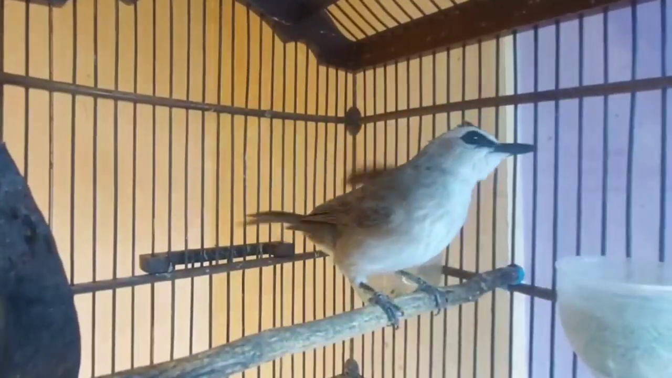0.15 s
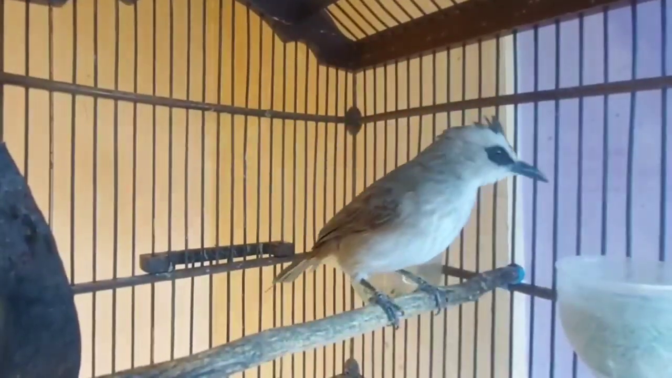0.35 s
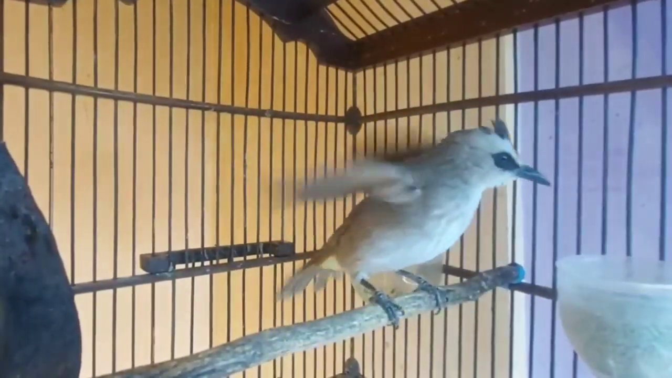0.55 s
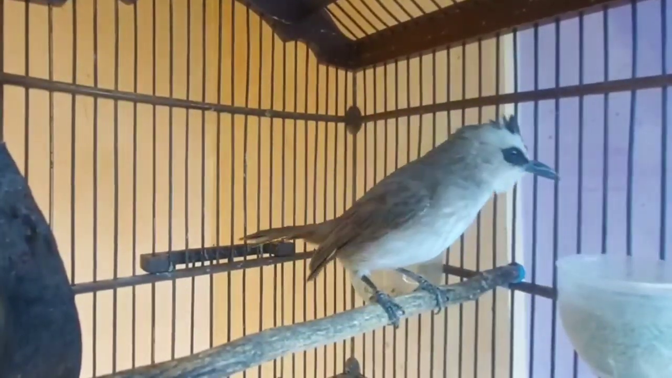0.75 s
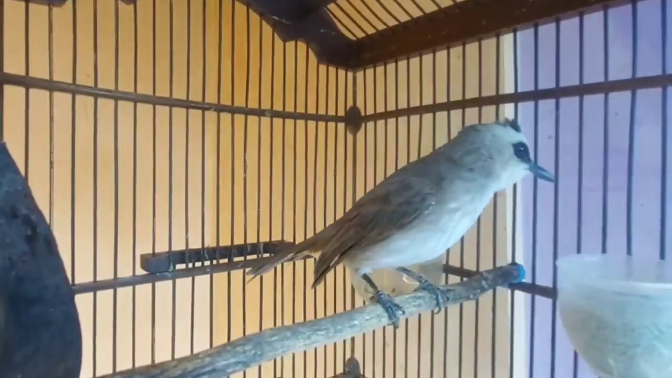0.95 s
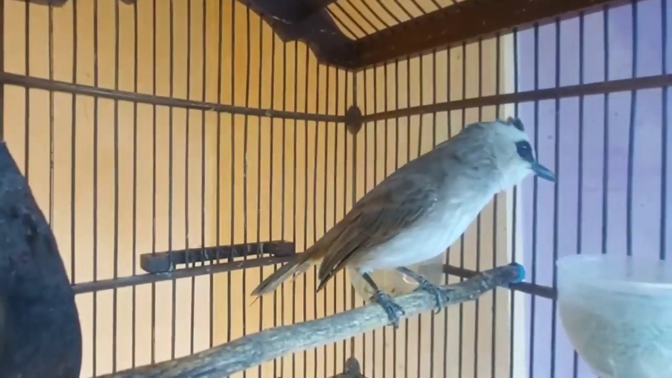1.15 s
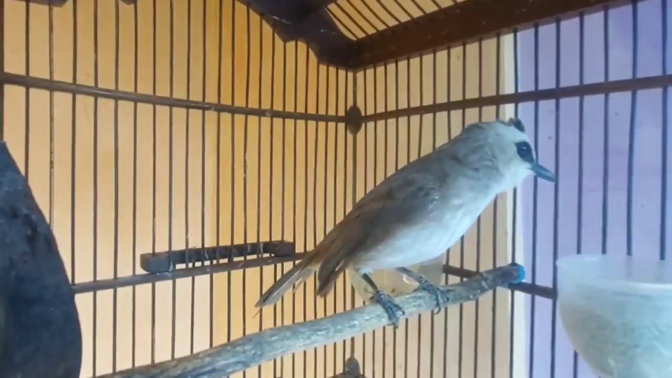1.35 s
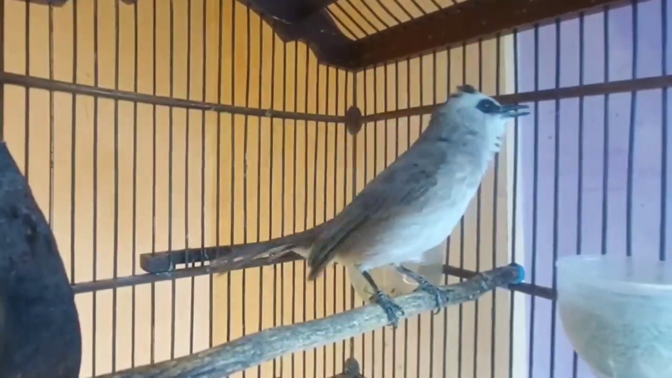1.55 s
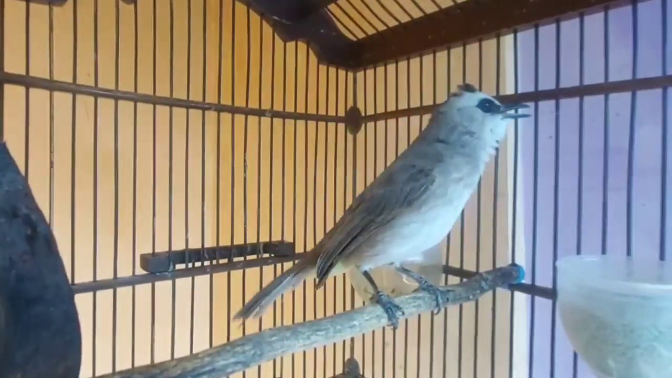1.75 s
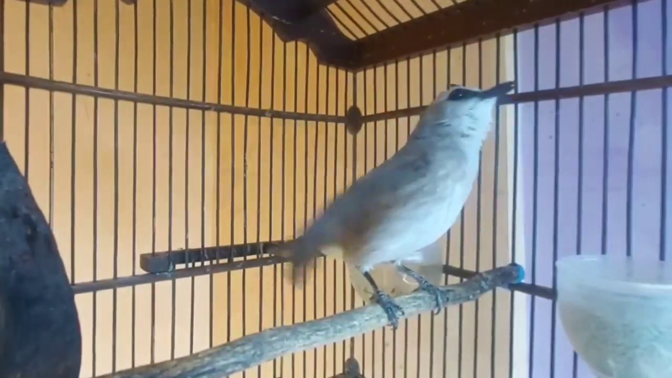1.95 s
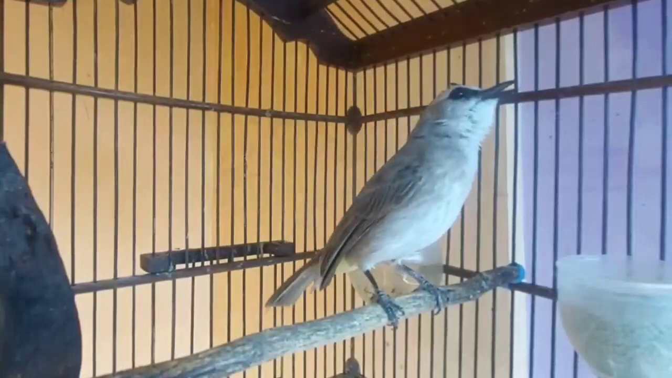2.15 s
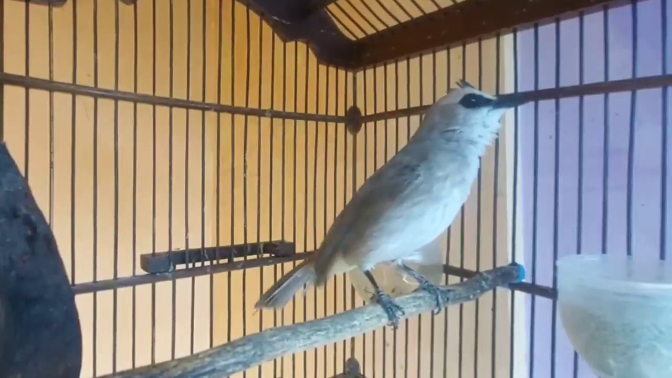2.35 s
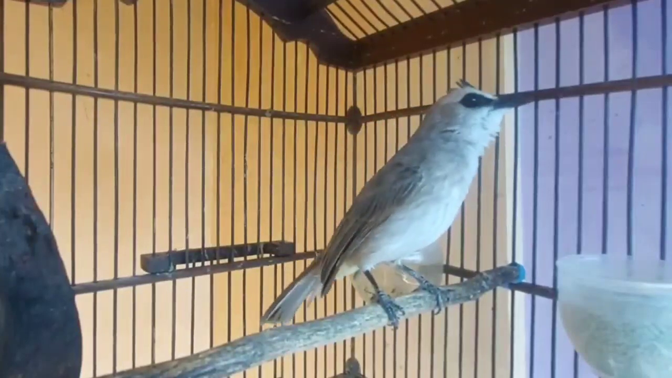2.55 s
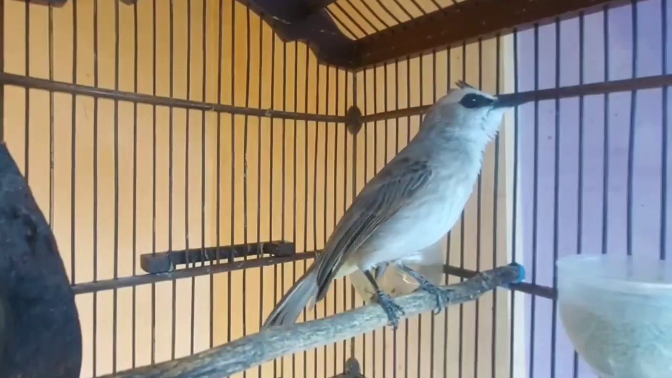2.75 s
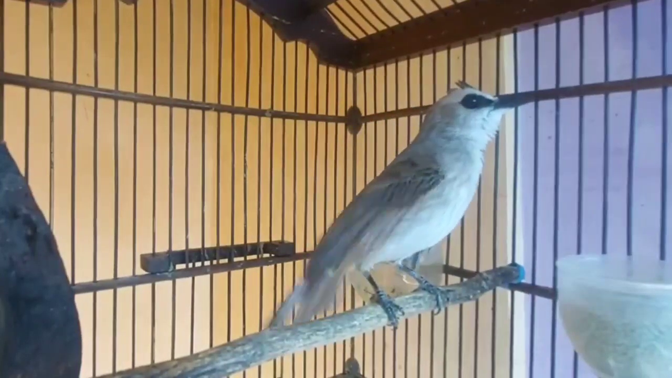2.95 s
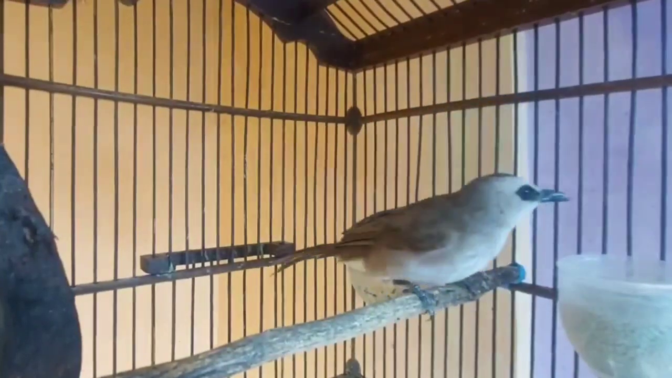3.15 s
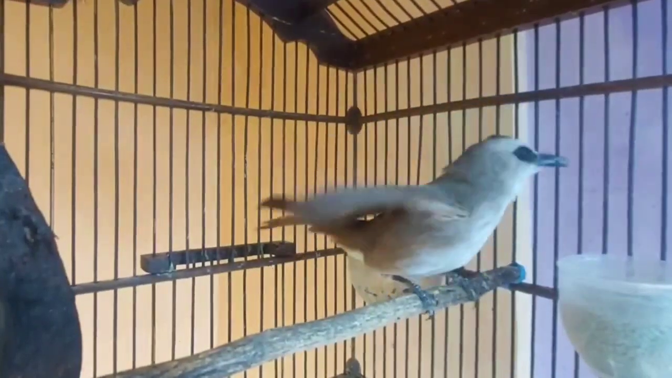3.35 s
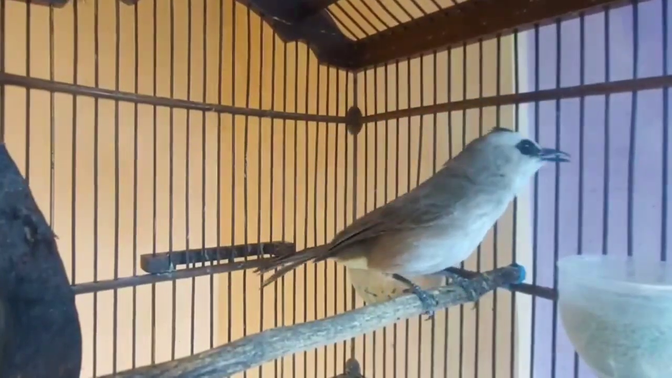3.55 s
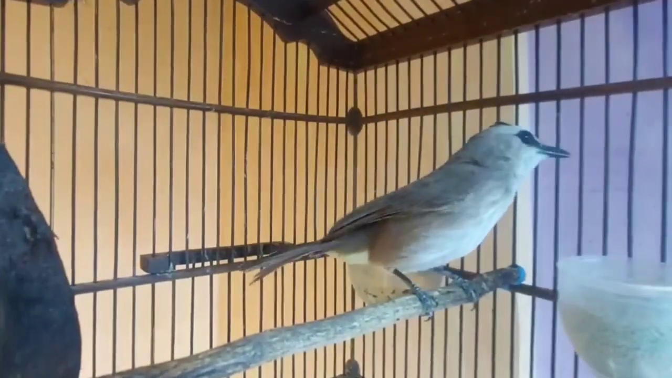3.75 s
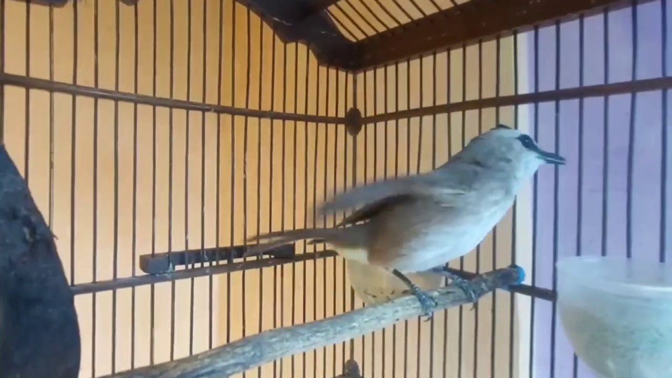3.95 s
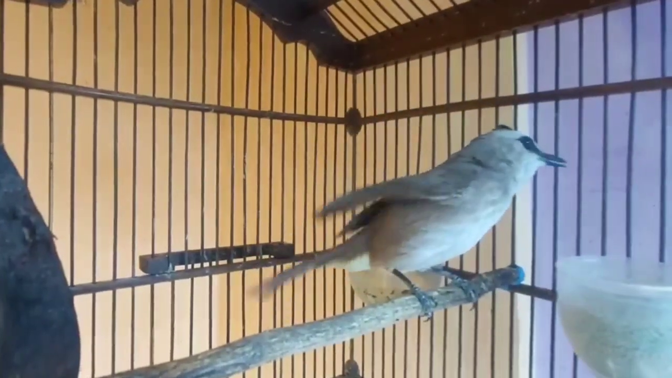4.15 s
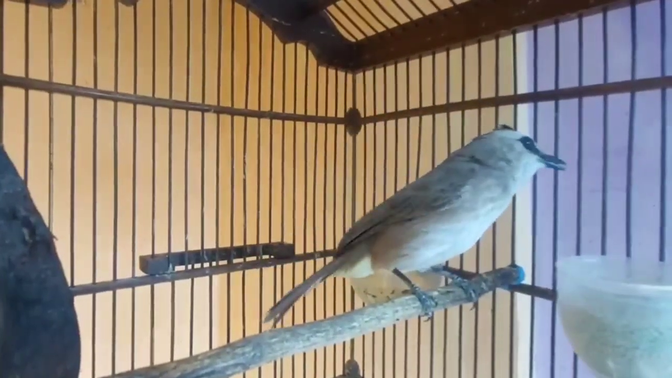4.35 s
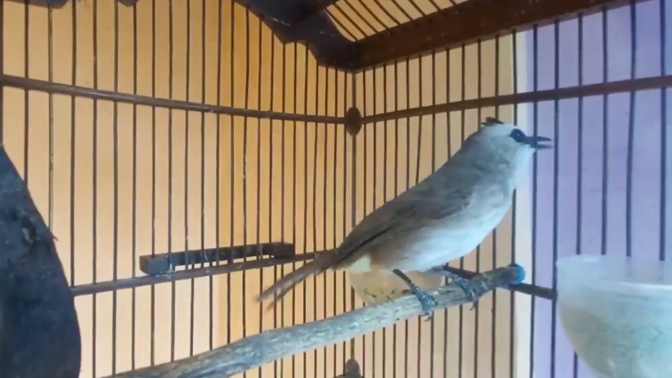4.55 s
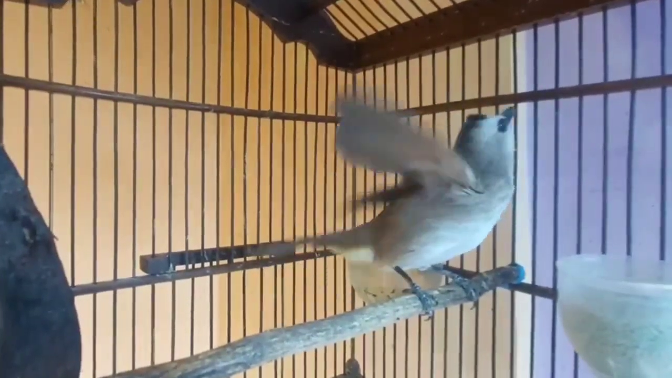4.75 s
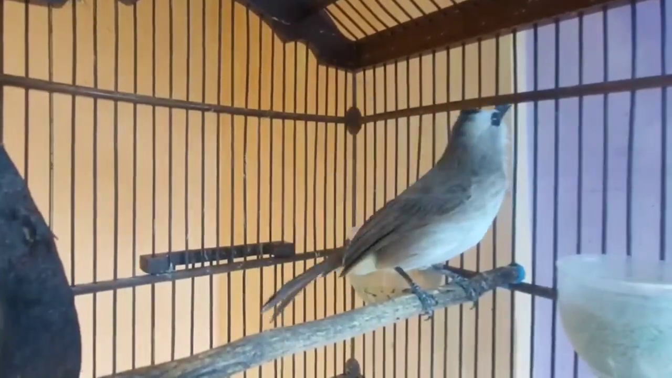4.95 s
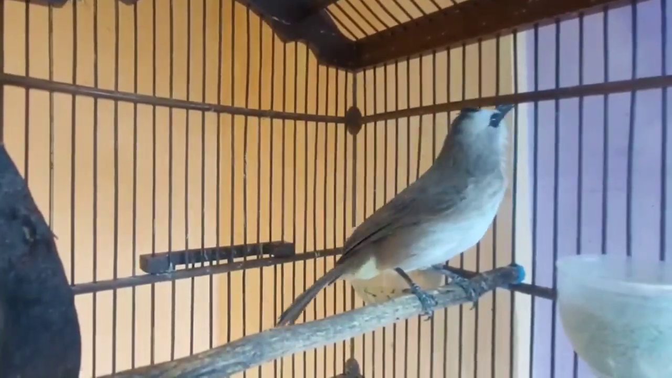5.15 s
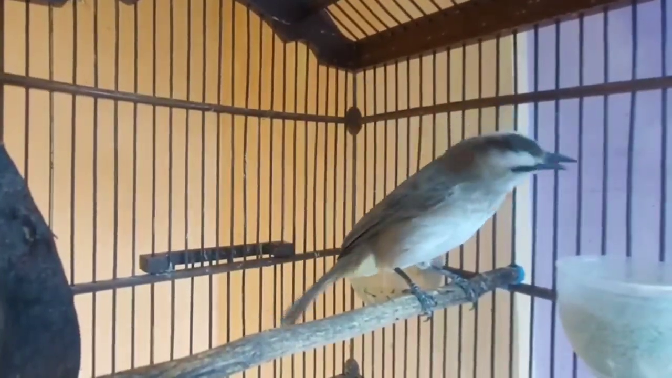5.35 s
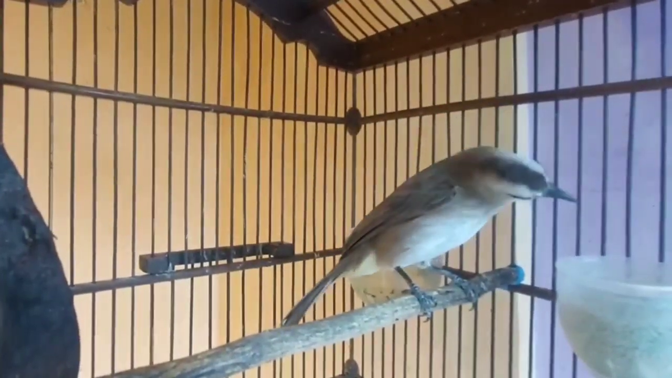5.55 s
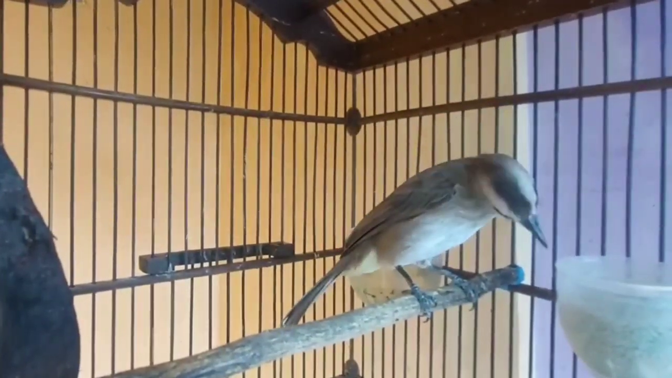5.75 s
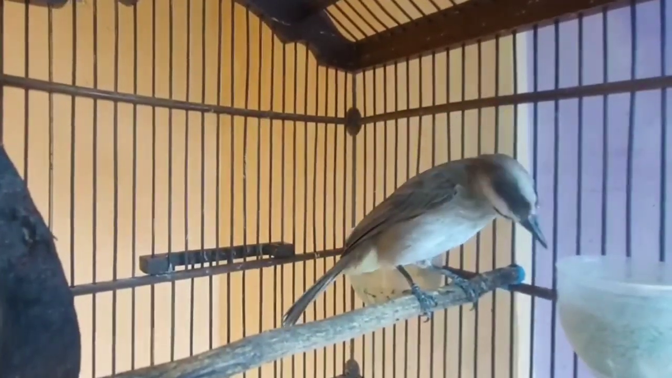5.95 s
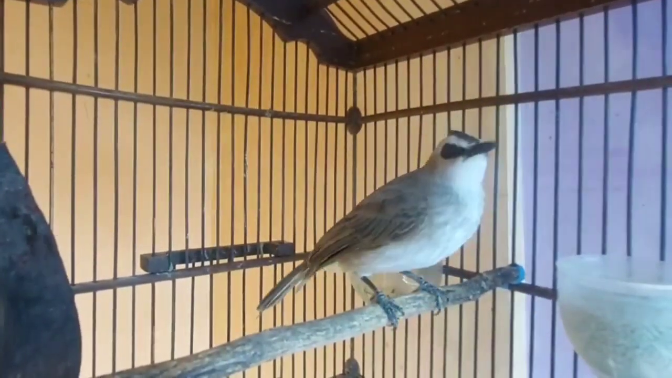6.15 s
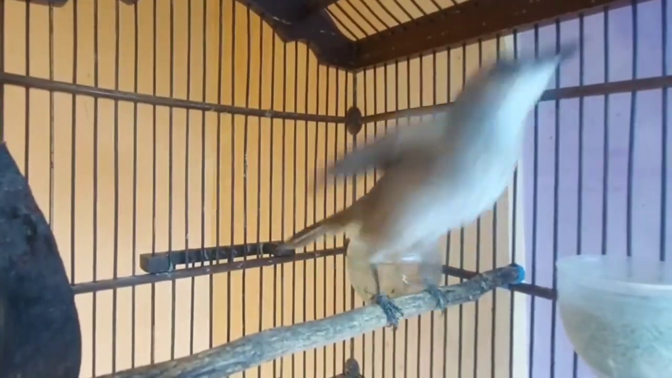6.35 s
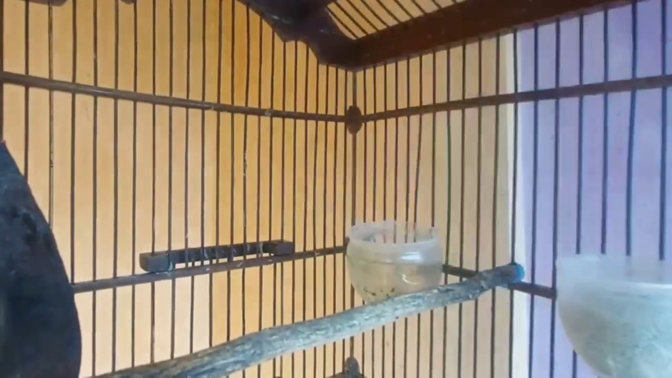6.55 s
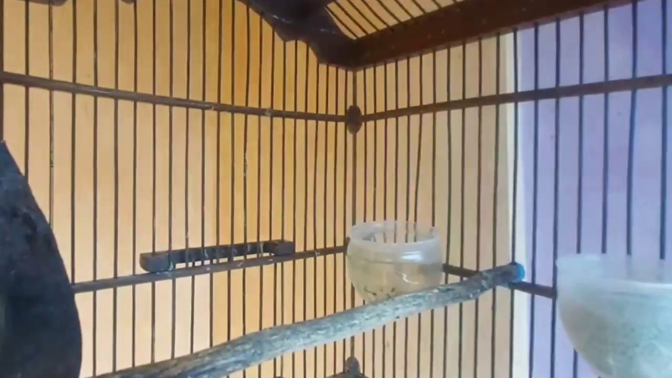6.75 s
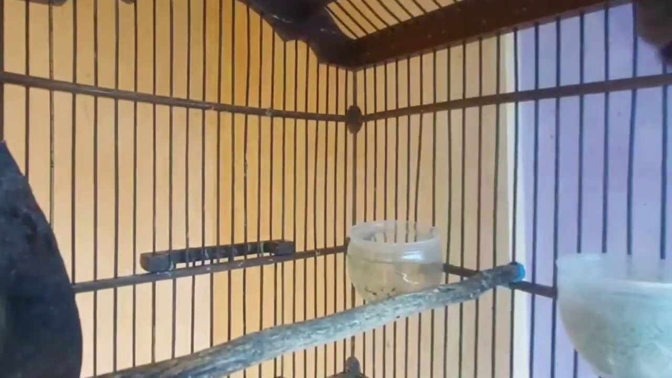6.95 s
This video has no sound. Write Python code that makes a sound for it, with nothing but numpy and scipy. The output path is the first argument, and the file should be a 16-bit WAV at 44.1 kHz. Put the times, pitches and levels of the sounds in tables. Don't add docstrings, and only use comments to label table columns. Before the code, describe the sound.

A caged songbird close by gives two chups, a fast tumbling phrase and a run of sharp chips, then rattles and flutters off over low hum.

```python
import sys
import numpy as np
from scipy import signal
from scipy.fft import rfft, irfft, next_fast_len
from scipy.io import wavfile
from scipy.ndimage import uniform_filter1d

SR = 44100
rng = np.random.default_rng(int(sys.argv[2]) if len(sys.argv) > 2 else 0)


def gain_from_decibels(decibels):
    exponent = np.asarray(decibels, float) / 20
    return 10 ** exponent


def wrap_up_sound(samples):
    columns = np.atleast_2d(samples).T
    tamed = np.clip(columns, -1, 1)
    steps = np.round(tamed * 32767).astype(np.int16)
    wavfile.write(sys.argv[1], SR, steps)


N = 312669

# time_s, pitch_hz, effort_db
CHUP = [(0, 2600, -26), (.004, 2500, -19), (.006, 1950, -6), (.013, 2050, -5), (.02, 1900, 0),
        (.026, 1600, -4), (.032, 1460, -2), (.039, 1350, -20)]
SLIDE = [(0, 3837, -28), (.004, 3688, -1), (.008, 2918, 1.5), (.022, 2352, -4), (.045, 2100, -4),
         (.07, 1922, -5), (.078, 1810, -19.5)]
ARCH = [(0, 798, -14), (.015, 1444, 1), (.03, 2219, 2), (.042, 2865, -2), (.048, 2837, -8),
        (.051, 2500, 5.5), (.056, 1510, -0.5), (.063, 835, -12.5)]
PLUNGE = [(0, 2990, -16.5), (.004, 2701, 4.5), (.011, 1932, 3), (.021, 1300, -7), (.034, 850, -6.5)]
DIP = [(0, 2995, -6.5), (.005, 2735, 6), (.018, 2550, 1), (.025, 2370, -21)]
LIFT = [(0, 1338, -6), (.008, 3106, -2), (.024, 2787, 2.5), (.046, 3095, 7.5), (.058, 3593, -3),
        (.063, 3714, -28.5)]
HOP = [(0, 1915, -11), (.003, 1845, 3), (.009, 2050, 0.5), (.013, 2742, 7), (.017, 2524, 2),
       (.025, 2400, -3.5), (.035, 1872, 0.5), (.044, 1764, -22)]
CHIP = [(0, 2641, -13.5), (.004, 2420, -7.5), (.009, 2085, -2.5), (.011, 2970, 7), (.017, 2940, 4.5),
        (.024, 2541, 0.5), (.029, 2330, 0.5), (.048, 2133, 1), (.054, 2220, -29)]
PEEP = [(0, 3255, -15), (.008, 2714, 14.5), (.022, 2425, 7.5), (.038, 2100, 7.5), (.044, 2160, -33.5)]
HOOK = [(0, 3636, -21), (.005, 2990, 5.5), (.01, 2202, -2.5), (.018, 2442, 1), (.032, 2300, -5),
        (.04, 2360, -27)]
RATTLE = [(0, 2936, -6), (.004, 2725, 3), (.011, 1659, -1), (.017, 2334, -0.5), (.034, 2228, -4.5),
          (.039, 2140, -30)]

# start_s, level_db, pitch_factor, length_factor
CHUPS = [(.809, 4.5, 0.98, 0.97), (1.123, 4, 0.98, .91)]
SLIDES = [(1.51, -5.5, 0.94, 0.99), (1.886, -4, 0.95, 1.06), (2.301, -3, 1, .81)]
ARCHES = [(1.635, -9, 1.03, 0.98), (2.028, -10, .99, 1.05), (2.522, -9.5, .97, .99)]
PLUNGES = [(2.369, -9, 1.01, 1.01)]
DIPS = [(1.703, -6, 0.99, 0.95), (2.101, -5.5, 0.98, 0.87), (2.419, -15, .72, 0.95),
        (2.596, -8, 0.89, 0.85)]
LIFTS = [(1.762, -10, 1.037, 1.01), (2.161, -8, 1.007, 1.163), (2.656, -8, .99, 1.01)]
HOPS = [(3.475, -7, 1.01, 1.01)]
CHIPS = [(3.725, -6.5, .96, .98), (3.961, -7.5, .91, 1.01), (4.175, -6, 1, .95), (4.301, -6, .98, .9),
         (4.462, -5, 1.02, .9), (4.589, -5, 1, .88), (4.759, -6, 1.013, .93), (4.906, -7, 1.01, .88),
         (5.087, -7.5, 0.99, .96), (5.434, -7, 1.001, .9)]
PEEPS = [(6.56, -19.5, 0.97, 1.09)]
HOOKS = [(6.65, -4.5, .97, .85)]
RATTLES = [(6.735, -4.5, 1.03, 0.9), (6.815, -5, 0.97, .9), (6.902, -8.5, .99, 0.87)]

# shape, times_sung, undertone_db, octave_db, air_db, buzz_depth (0-1), brightness_db
VOICES = [(CHUP, CHUPS, -25.5, -39.5, -12.5, 0.05, -1.7), (SLIDE, SLIDES, -30.5, -36.5, 4.6, 0.88, -1.8),
          (ARCH, ARCHES, -35.5, -25, 8.7, 0.16, -8), (PLUNGE, PLUNGES, -30.5, -24.5, -1, 0.1, -1),
          (DIP, DIPS, -43, -32.5, 3.5, 0.067, -5.5), (LIFT, LIFTS, -40, -22.5, -9, 0.04, 3),
          (HOP, HOPS, -23, -34, 4.7, .6, 5), (CHIP, CHIPS, -33.5, -32.5, -0.63, 0.18, 5.97),
          (PEEP, PEEPS, -18, -10.5, 3, 0.069, -1), (HOOK, HOOKS, -26, -14, -6.5, 0.071, -2.5),
          (RATTLE, RATTLES, -27, -14, -25, 0.29, 2.2)]
OVERTONES_DB = [-29.5, -26, -30, -31.5, -34.5, -32, -33.5]
# freq_hz, gain_db
THROAT = [(700, -17), (1500, -8), (2300, 3.5), (3200, -7), (4500, -3.5), (7000, -17.5), (9600, -11.5),
          (12000, -2), (15500, -5.5)]
# freq_hz, density_db_per_hz
AIR = [(2500, -22), (3600, -4), (4400, -10.5), (5800, -11.5), (7500, -39.5), (9300, -1), (11600, -2.5),
       (13500, -21.5), (16000, -26.5)]
AIR_DB = -26
BUZZ_HZ, LEAD_S, LEAD_DB_PER_S = 461.6, .004, 9000
RASP, WHIM = .035, .014
ONSET_OCTAVE_DB = 12.5

# start_s, peak_db, decay_s
TICKS = [(0.909, -35.5, .002), (3.047, -57.5, .02), (3.201, -50, 0.0013), (6.465, -36, 0.00252),
         (6.572, -28, 0.011), (6.619, -23.5, 0.0089)]
# start_s, length_s, start_hz, end_hz, level_db
FAR = [(0, 0.015, 2620, 2630, -37), (.038, 0.024, 3080, 3020, -43.5), (.195, 0.038, 2550, 2515, -32.5),
       (.407, 0.025, 2050, 3120, -38.5), (.485, 0.047, 3120, 2980, -40), (.609, 0.015, 2600, 2570, -41.5),
       (.679, 0.042, 2607, 2328, -31.5), (.895, 0.076, 3480, 3550, -42), (1.073, 0.038, 2133, 2142, -32.5),
       (1.09, 0.012, 2600, 2750, -37), (1.237, 0.08, 3750, 3780, -47), (1.398, 0.22, 2270, 2400, -42.5),
       (1.413, 0.028, 2570, 2740, -40.5), (2.975, 0.041, 2840, 3130, -60), (3.06, 0.15, 2030, 1950, -65),
       (5.813, 0.044, 4480, 4510, -64), (5.95, 0.0467, 3760, 3166, -56), (6.116, 0.025, 3740, 2430, -49.5),
       (6.152, 0.024, 3750, 3790, -48), (6.255, 0.022, 3120, 2313, -46.5), (6.282, 0.051, 2437, 2910, -50),
       (6.35, 0.05, 3830, 3220, -56), (6.339, 0.22, 2180, 2204, -39.5)]
# start_s, length_s, start_hz, end_hz, level_db
SHRILL = [(5.766, 0.059, 4055, 3950, -57), (5.84, 0.051, 3890, 3460, -55.5)]
SHRILL_OVERTONE_DB = -15.5
# delay_s, level_db
ECHOES = [(.0013, -26.5), (.0031, -16), (.0057, -12), (.0092, -11), (.0135, -17.5), (.019, -30),
          (.026, -20.5)]
# freq_hz, t60_s
ROOM = [(1000, 0.21), (2500, 0.27), (5000, 0.13), (11000, 0.18)]
ROOM_DB = -13.5

# cut_s, held_rumble_db, release_s, back_s, back_rumble_db
DUCKS = [
    (1.512, -42.5, 3.2, 3.47, -26),
    (3.469, -41.5, 5.07, 6.35, -36.5),
    (6.68, -35, 7.0, 7.09, -38.5),
]
OPEN_DB, CUT_S, SAG_DB = -31.5, 0.044, -2
TAKE_OFF = (6.6, -28)
# freq_hz, density_db_per_hz
RUMBLE = [(20, -31), (42, -1), (85, 1), (130, -8), (200, -10), (350, -17), (550, -23), (1600, -44.5),
          (3000, -85)]
# freq_hz, level_db (re rumble)
HUM = [(100, 0), (300, -10), (183, -18), (505, -23)]
# freq_hz, density_db_per_hz
HISS = [(500, 4), (1200, 5.5), (2500, 9), (5000, -4), (8000, -7.5), (11000, -5.5), (14500, -7),
        (16300, -18.5)]
HISS_DB, HISS_SHARE = -54, 1.3
CRICKET_HZ, CRICKET_DB = 5800, -17.5
WASH_DB, WASH_S = -64, 0.091
# start_s, length_s, level_db, centre_hz, width_octaves
RUSTLES = [(0.196, 0.14, -57.5, 9000, 0.97), (0.624, 0.2, -54.5, 7960, 1.8), (1.31, 0.11, -52, 1080, 0.36),
           (2.701, 0.27, -59, 1300, .5), (3.209, 0.22, -49, 2780, 0.64), (3.353, 0.091, -50, 4400, 0.28),
           (3.394, 0.08, -55, 10900, 0.49), (6.414, 0.33, -53, 2908, 1.6), (6.47, 0.053, -48, 10120, 0.6),
           (6.55, 0.11, -44.5, 9000, 2.1), (6.964, 0.039, -58.5, 10200, 0.84)]


def evened(x):
    return x / np.sqrt(np.mean(x ** 2) + 1e-20)


def read(points, hz):
    f, value = np.transpose(points)
    return np.interp(np.log(hz + 1), np.log(f + 1), value)


def add(mix, start_s, sound):
    part = mix[round(start_s * SR):][:len(sound)]
    part += sound[:len(part)]


def coloured(x, points):
    size = next_fast_len(len(x))
    gain = gain_from_decibels(read(points, np.fft.rfftfreq(size, 1 / SR)))
    return irfft(rfft(x, size) * gain, size)[:len(x)]


def drift(seconds):
    size = max(round(seconds * SR), 1)
    once = uniform_filter1d(rng.standard_normal(N), size)
    return evened(uniform_filter1d(once, size))


def streaky(patchy_db):
    z = signal.stft(rng.standard_normal(N), nperseg=256)[2]
    patches = uniform_filter1d(rng.standard_normal(z.shape), size=2, axis=0)
    patches = uniform_filter1d(patches, size=9, axis=1)
    return evened(signal.istft(z * gain_from_decibels(patchy_db * evened(patches)), nperseg=256)[1][:N])


def bird():
    voice, breath = np.zeros(N), np.zeros(N)
    wobble, whim = drift(0.0016), drift(.012)
    falter = 1.5 * np.tanh(drift(.0025) / 1.3)
    beat = np.sin(2 * np.pi * np.cumsum(BUZZ_HZ * (1 + 0.35 * drift(0.0033))) / SR)
    for shape, rows, under_db, octave_db, air_db, buzz, bright_db in VOICES:
        at_s, pitch_hz, effort_db = np.transpose(shape)
        for start_s, db, pitch, length in rows:
            t = np.arange(-LEAD_S, at_s[-1] * length, 1 / SR)
            now = slice(round(start_s * SR), round(start_s * SR) + len(t))
            settled = 1 - np.exp(-(np.maximum(t, 0) / 0.01) ** 2)

            scatter = 0.011 + RASP * buzz ** 2 * settled
            hz = pitch * np.interp(t, at_s * length, pitch_hz)
            hz = hz * (1 + scatter * wobble[now] + WHIM * whim[now])
            turn = 2 * np.pi * np.cumsum(hz) / SR

            slack_db = 24 * np.clip(2.1 - hz / 1050, -.6, 1)
            upper = gain_from_decibels(octave_db + slack_db + 4.1 * wobble[now]) * np.sin(2 * turn)
            pure_start = (hz > 2500) | (abs(np.gradient(hz)) > 2.4)
            onset = np.where(pure_start, settled, gain_from_decibels(ONSET_OCTAVE_DB * (1 - settled)))
            upper *= uniform_filter1d(onset, size=80)
            for multiple, over_db in enumerate(OVERTONES_DB, 3):
                gain = settled * gain_from_decibels(over_db + 0.09 * slack_db + wobble[now][::-1])
                upper += gain * np.sin(multiple * turn) * (multiple * hz < 15500)
            under = gain_from_decibels(under_db) * (np.sin(turn / 2) + .5 * np.sin(3 * turn / 2))

            level = gain_from_decibels(db + np.interp(t, at_s * length, effort_db) + LEAD_DB_PER_S * np.minimum(t, 0))
            level *= signal.windows.tukey(len(t), .08) * (1 + buzz * settled * beat[now])
            level *= gain_from_decibels(2.5 * falter[now])
            add(voice, start_s - LEAD_S, level * (np.sin(turn) + under + gain_from_decibels(bright_db) * upper))
            add(breath, start_s - LEAD_S, level * gain_from_decibels(air_db + bright_db - 99 * t))
    rush = evened(coloured(streaky(patchy_db=5.5), AIR))
    return coloured(voice, THROAT) + gain_from_decibels(AIR_DB) * breath * rush


def ticks():
    out, grit = np.zeros(N), evened(coloured(rng.standard_normal(N), HISS))
    for start_s, db, decay_s in TICKS:
        add(out, start_s, gain_from_decibels(db) * np.exp(-np.arange(0, 6 * decay_s, 1 / SR) / decay_s))
    return out * grit


def far_birds():
    out, wobble = np.zeros(N), drift(0.0013)
    for rows, over in ((FAR, 0), (SHRILL, gain_from_decibels(SHRILL_OVERTONE_DB))):
        for start_s, length_s, from_hz, to_hz, db in rows:
            hz = np.linspace(from_hz, to_hz, round(length_s * SR))
            waver = wobble[round(start_s * SR):][:len(hz)]
            turn = 2 * np.pi * np.cumsum(hz * (1 + .024 * waver)) / SR
            tone = np.sin(turn) + over * (np.sin(2 * turn) + np.sin(3 * turn))
            tone *= gain_from_decibels(3 * waver[::-1])
            add(out, start_s, gain_from_decibels(db) * tone * signal.windows.tukey(len(hz), .4))
    return out


def cage(x):
    out = x.copy()
    for k, (delay_s, db) in enumerate(ECHOES):
        add(out, delay_s, (-1) ** k * gain_from_decibels(db) * x)
    return out


def room(x):
    taps = np.zeros(SR)
    at = np.arange(300, SR - 20, 20) + rng.integers(0, 20, (SR - 301) // 20)
    taps[at] = rng.choice([-1., 1.], len(at))
    hz, t, z = signal.stft(taps, SR, nperseg=256)
    decay = gain_from_decibels(-60 * t / read(ROOM, hz)[:, None])
    tail = signal.istft(z * decay, SR, nperseg=256)[1]
    return signal.fftconvolve(x, tail / np.linalg.norm(tail))[:N]


def rustles():
    out, flutter = np.zeros(N), gain_from_decibels(1.9 * drift(0.026))
    for start_s, length_s, db, hz, octaves in RUSTLES:
        hump = [(hz * 2 ** (k * octaves), -6. * k * k) for k in range(-4, 5)]
        puff = evened(coloured(rng.standard_normal(SR // 2), hump))[:round(length_s * SR)]
        add(out, start_s, gain_from_decibels(db) * puff * signal.windows.tukey(len(puff), .5))
    return out * flutter


def gain_control():
    points = [(0, OPEN_DB), (DUCKS[0][0], OPEN_DB), TAKE_OFF]
    for cut_s, held_db, release_s, back_s, back_db in DUCKS:
        points += [(cut_s + CUT_S, held_db), (release_s, held_db + SAG_DB), (back_s, back_db)]
    return np.interp(np.arange(N) / SR, *np.transpose(sorted(points)))


def background(song):
    t = np.arange(N) / SR
    rumble = evened(coloured(rng.standard_normal(N), RUMBLE)) * gain_from_decibels(1.1 * drift(0.03))
    hum = sum(gain_from_decibels(db + 1.5 * drift(.05)) * np.sin(2 * np.pi * hz * t) for hz, db in HUM)
    hiss = evened(coloured(rng.standard_normal(N), HISS)) * gain_from_decibels(0.77 * drift(0.017))
    cricket = gain_from_decibels(CRICKET_DB + 4 * drift(.15)) * drift(0.0041) * np.sin(2 * np.pi * CRICKET_HZ * t)

    keep = np.exp(-1 / (WASH_S * SR))
    wash = gain_from_decibels(WASH_DB) * np.sqrt(signal.lfilter([1 - keep], [1, -keep], evened(song) ** 2))
    level_db = gain_control()
    hiss_level = gain_from_decibels(HISS_DB + HISS_SHARE * (level_db - OPEN_DB))
    low = gain_from_decibels(level_db - 1.0) * (rumble + hum)
    return low + hiss_level * (hiss + cricket) + wash * hiss + rustles()


def scene():
    near, far = bird() + ticks(), cage(far_birds())
    tail = gain_from_decibels(ROOM_DB) * room(near + gain_from_decibels(8.5) * far)
    return (gain_from_decibels(-2.5) * cage(near) + tail + 0.7 * far + background(near))[None]


def squelch(x, under_db, depth_db):
    z = signal.stft(x, nperseg=512)[2]
    power = uniform_filter1d(uniform_filter1d(abs(z) ** 2, 5, 1), 3, 2)
    level_db = 10 * np.log10(power + 1e-14)
    gap_db = level_db.max(1, keepdims=True) - under_db - level_db
    cut_db = np.clip(1.3 * gap_db, 0, depth_db)
    return signal.istft(z * gain_from_decibels(-cut_db), nperseg=512)[1][:, :N]


def top_cut(x):
    return signal.sosfilt(signal.butter(12, 16440, fs=SR, output="sos"), x)


def record(dry):
    band = signal.sosfilt(signal.butter(5, 40, "high", fs=SR, output="sos"), dry)
    band = np.clip(2.045 * np.tanh(band / 2.38), -1.02, 1.02)
    lowpass = signal.firwin(127, 15950, window=("kaiser", 9), fs=SR)
    band = signal.oaconvolve(band, lowpass[None], "same")
    return top_cut(squelch(band, under_db=57.0, depth_db=10))


dry = scene()
out = record(dry)
wrap_up_sound(out)
```